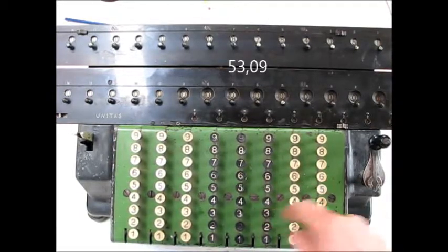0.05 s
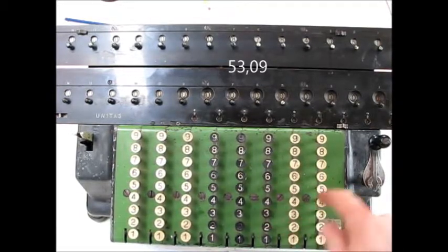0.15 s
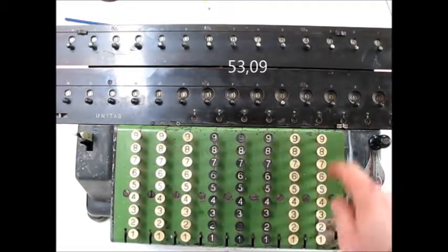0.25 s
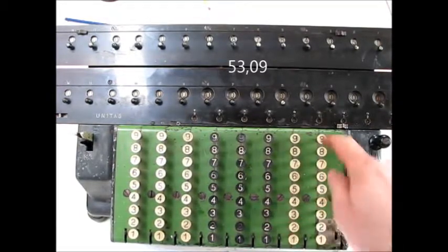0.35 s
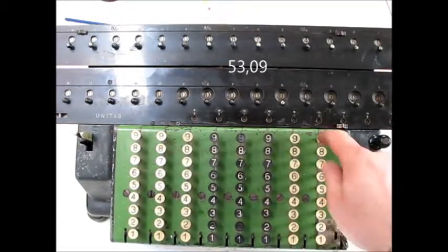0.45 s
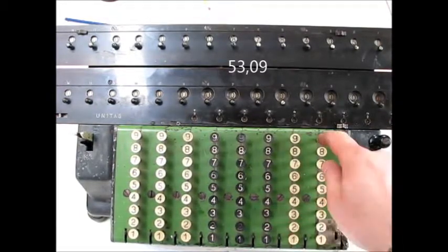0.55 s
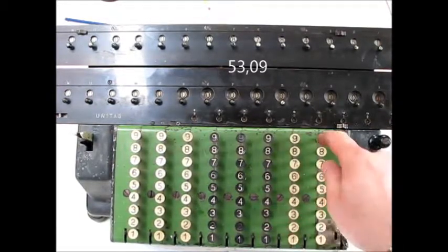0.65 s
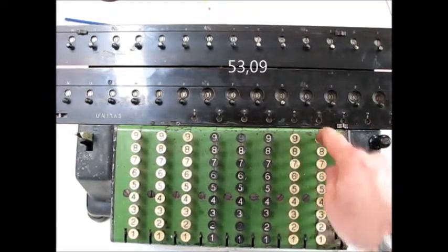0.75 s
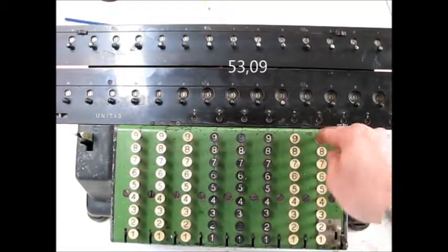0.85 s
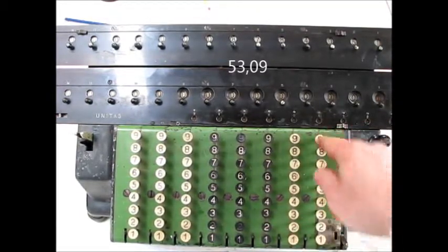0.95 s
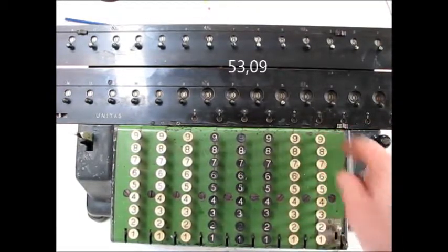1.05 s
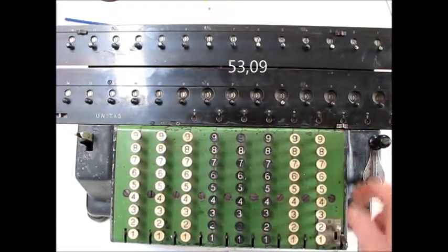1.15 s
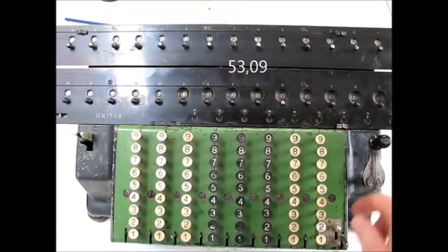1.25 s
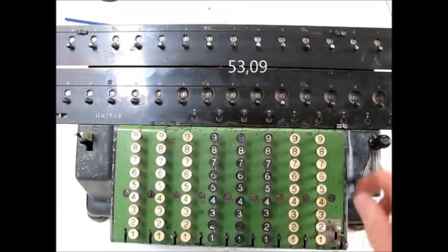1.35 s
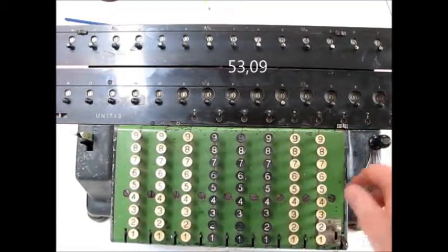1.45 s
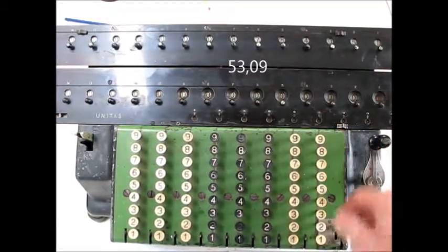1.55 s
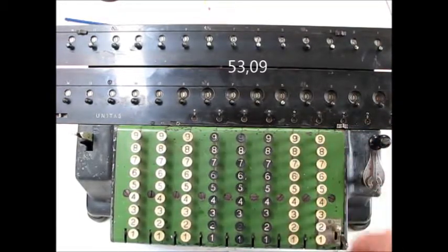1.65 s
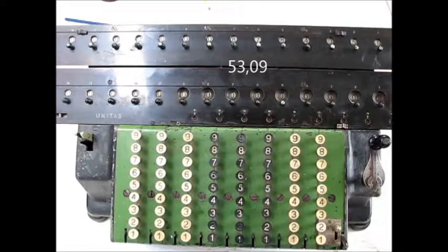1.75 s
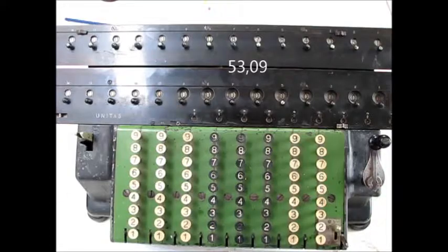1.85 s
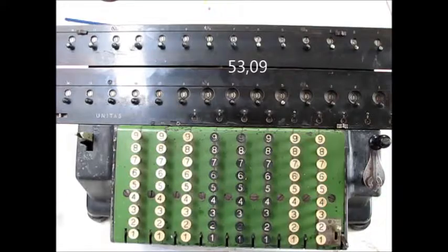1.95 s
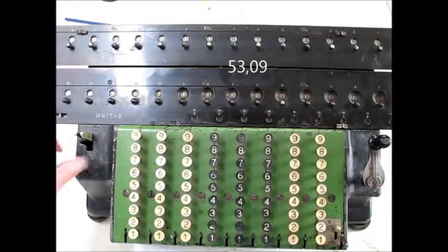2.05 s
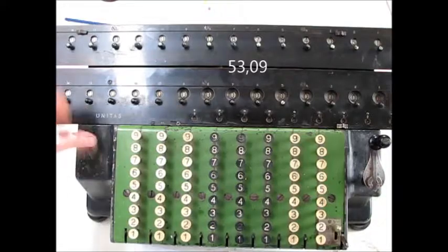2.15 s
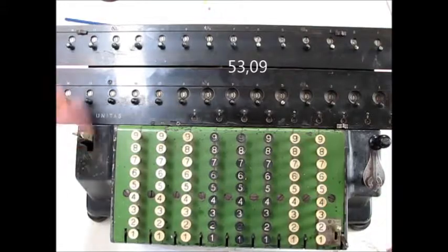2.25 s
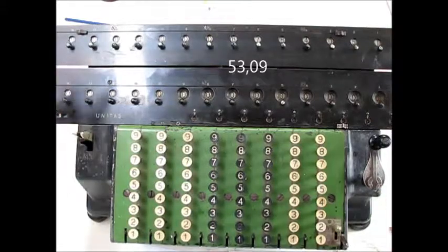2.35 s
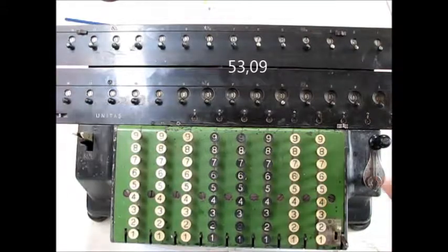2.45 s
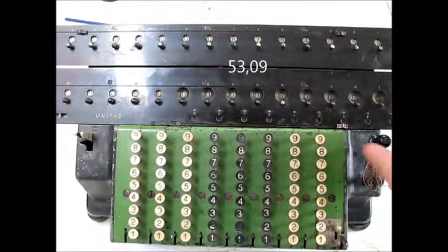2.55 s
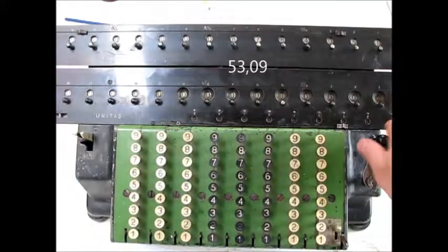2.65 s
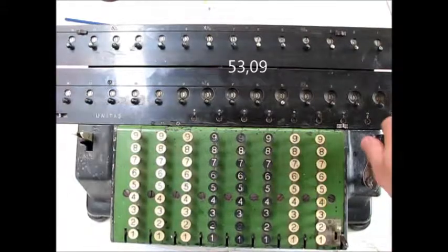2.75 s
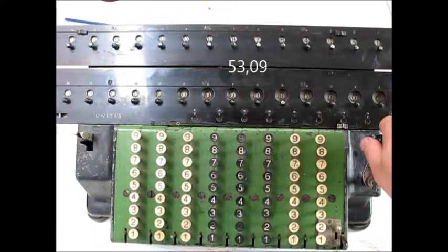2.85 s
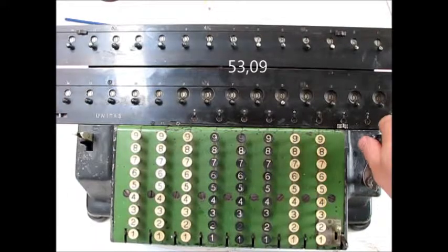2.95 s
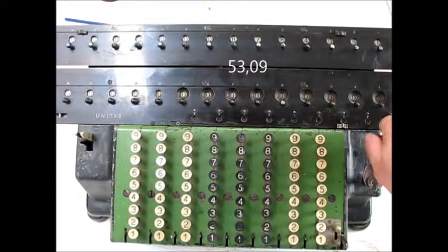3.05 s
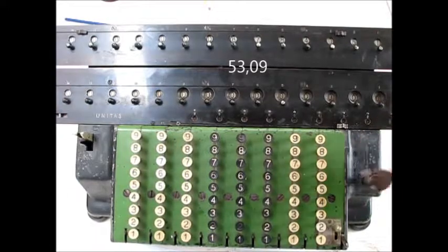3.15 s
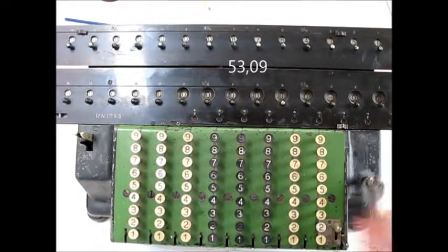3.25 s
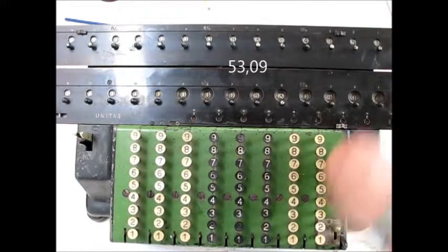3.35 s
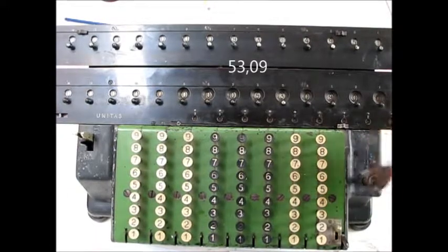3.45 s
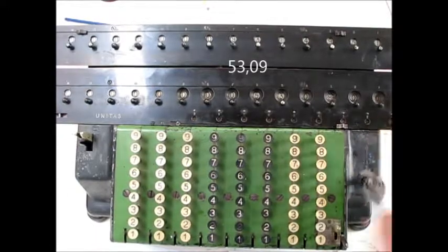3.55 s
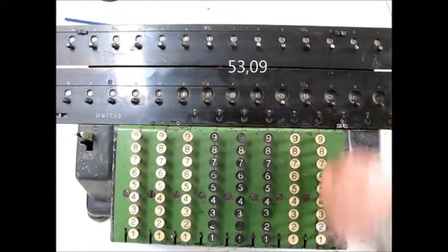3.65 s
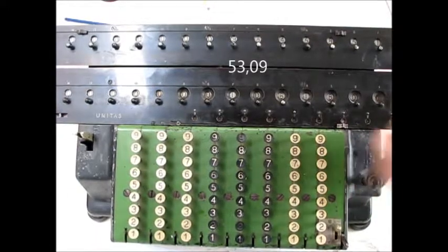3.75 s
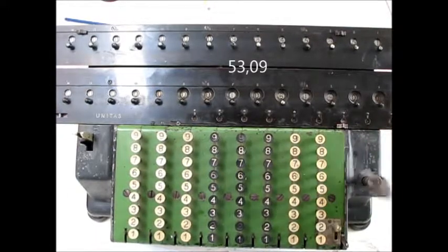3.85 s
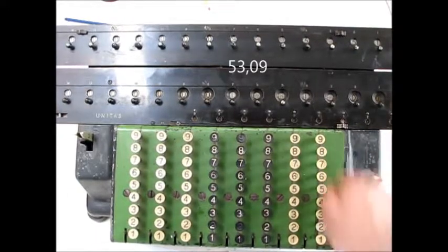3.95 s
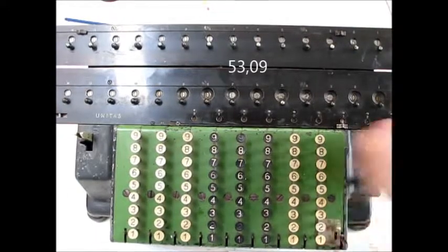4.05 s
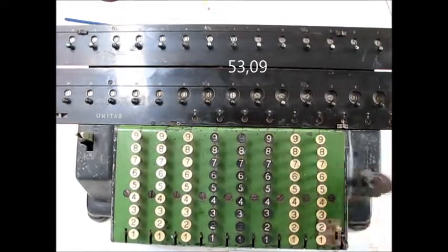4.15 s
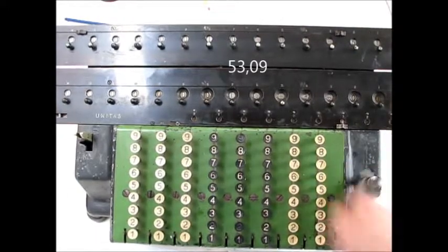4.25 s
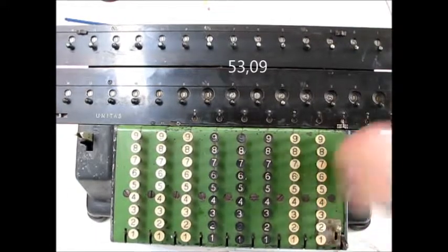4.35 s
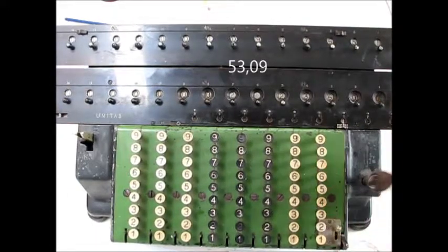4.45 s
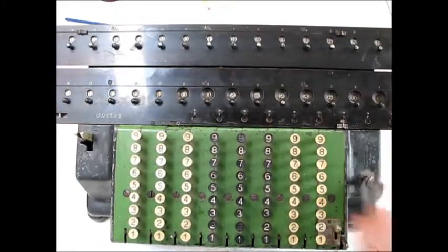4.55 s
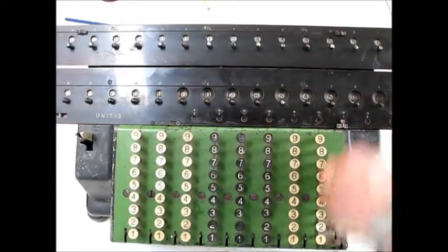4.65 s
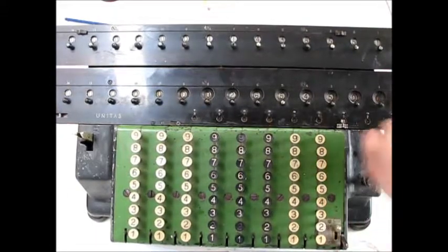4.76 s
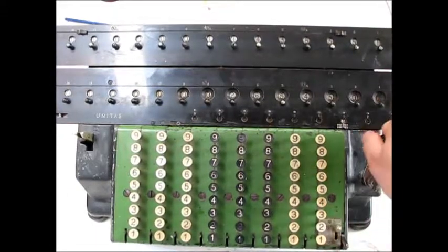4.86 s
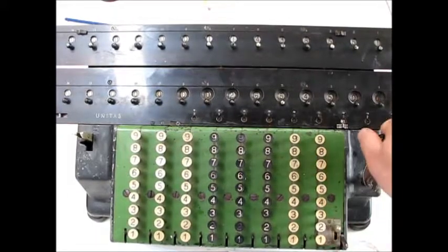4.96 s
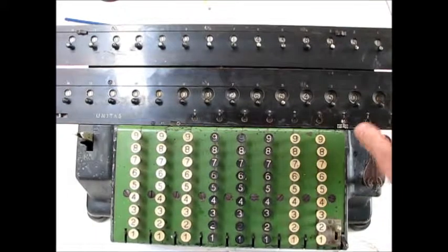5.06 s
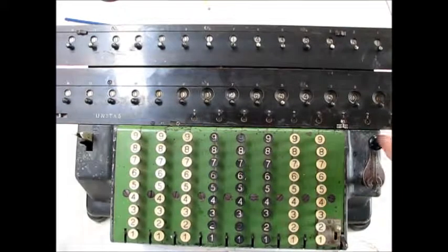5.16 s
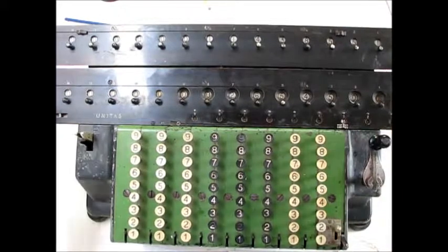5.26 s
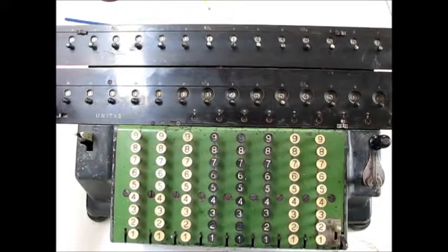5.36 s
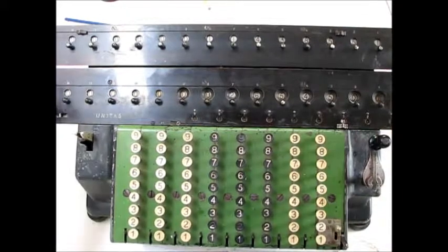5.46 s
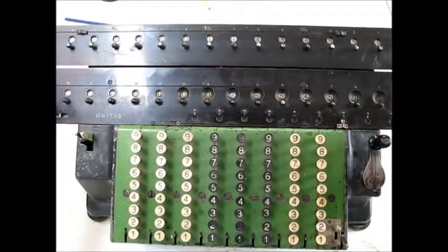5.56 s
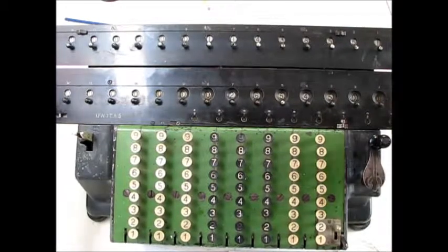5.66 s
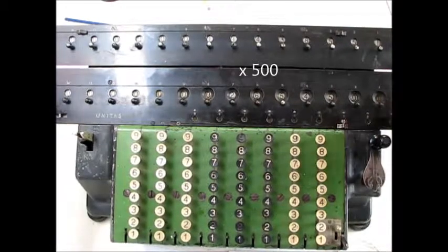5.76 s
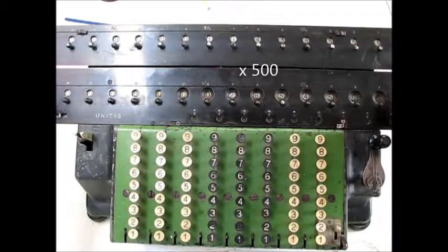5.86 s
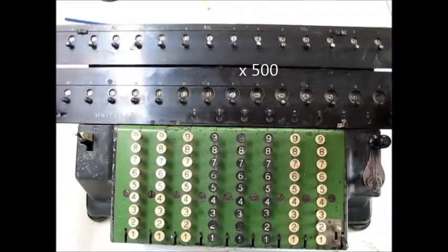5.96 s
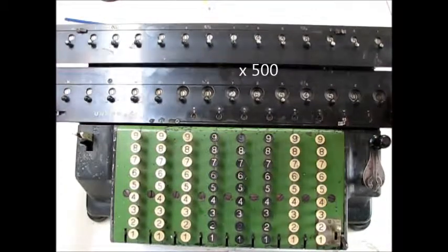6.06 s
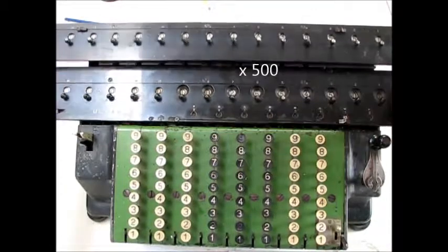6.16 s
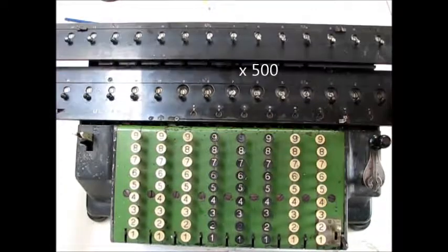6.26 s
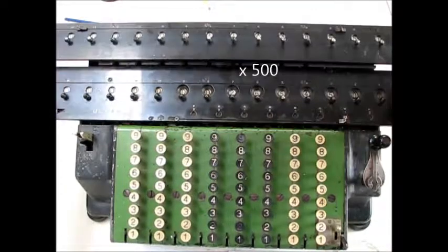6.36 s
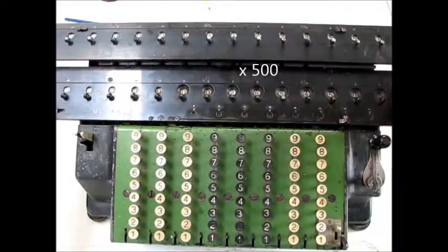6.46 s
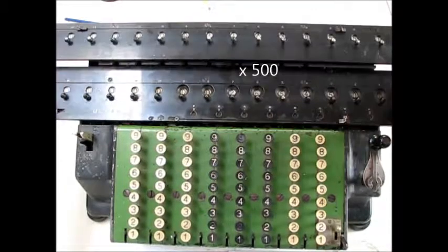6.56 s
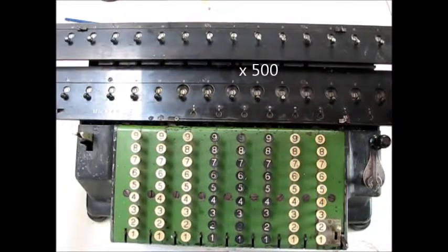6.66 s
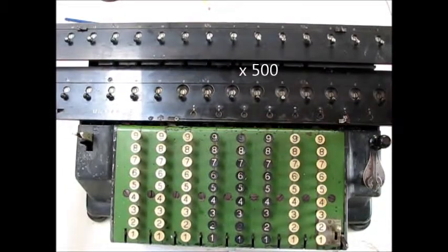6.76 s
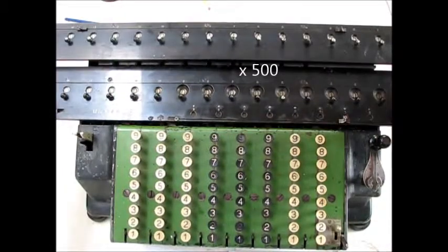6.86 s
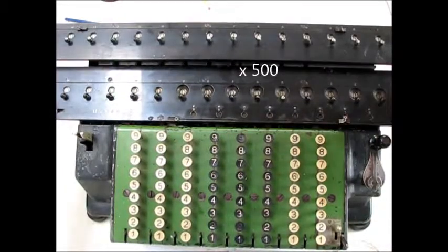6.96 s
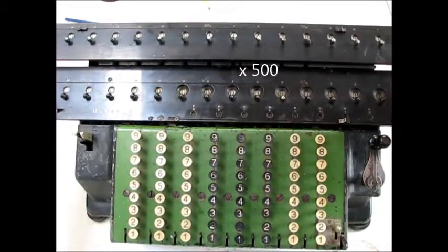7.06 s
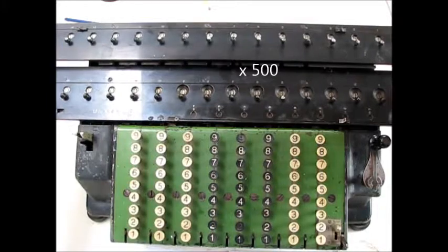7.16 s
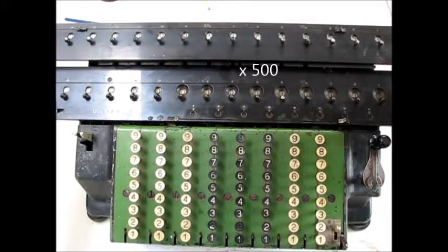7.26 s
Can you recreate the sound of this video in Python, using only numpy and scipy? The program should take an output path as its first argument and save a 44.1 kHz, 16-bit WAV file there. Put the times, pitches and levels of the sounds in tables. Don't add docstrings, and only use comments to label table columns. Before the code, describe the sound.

Close to the microphones in a small hard room, a steel key snaps down with a bright springy clack. Faint handling and dull slides follow. Then a hand crank turns five times in quick succession, each a pawl click, gear rattle, wheel knocks and a hard stop. A thin bar hums on quietly, then the carriage shifts and lands with several clattering metal knocks.

```python
import sys
import numpy as np
from scipy import signal
from scipy.fft import rfft, irfft, next_fast_len
from scipy.io import wavfile
from scipy.ndimage import uniform_filter1d

SR = 44100
rng = np.random.default_rng(int(sys.argv[2]) if len(sys.argv) > 2 else 0)


def digitize_waveform(pressure):
    field = np.atleast_2d(pressure).T
    bounded = np.clip(field, -1, 1)
    quanta = np.round(bounded * 32767).astype(np.int16)
    wavfile.write(sys.argv[1], SR, quanta)


def magnitude_from_level(level_db):
    exponent = np.asarray(level_db, float) / 20
    return 10 ** exponent


N = 321924

# (pawl lets go [s], crank meets the stop [s])
TURNS = [
    (3.1889, 3.4269),
    (3.5144, 3.7536),
    (3.8541, 4.078),
    (4.19, 4.4015),
    (4.5254, 4.7626),
]


def along(points, hz):
    f, v = np.transpose(points)
    return np.interp(np.log(hz + 1), np.log(f + 1), v)


def curves(rows):
    s, *cols = np.transpose(rows)
    return np.array([np.interp(np.arange(N) / SR, s, c, -120, -120) for c in cols])


def filtered(x, response):
    m = next_fast_len(N + SR // 4)
    return irfft(rfft(x, m) * response(np.fft.rfftfreq(m, 1 / SR)), m)[..., :N]


def causal(gain):
    cepstrum = irfft(np.log(gain + 1e-5))
    half = len(cepstrum) // 2
    cepstrum[1:half] *= 2
    cepstrum[half + 1:] = 0
    h = irfft(np.exp(rfft(cepstrum)))[:4096]
    return h / np.linalg.norm(h)


def ports(pair):
    # (frequency [Hz], left-right likeness [0-1])
    likeness = [(60, .97), (500, .97), (1400, .8), (3500, .42), (8000, .5), (15000, .55)]
    # (frequency [Hz], left port leads by [rad])
    left_lead = [(2000, 0), (5500, -.3), (8000, -1), (12000, -1.4), (16000, -2)]

    def turn(hz):
        return np.arccos(np.clip(along(likeness, hz), 0, 1)) / 2

    def lead(hz):
        return np.exp(.5j * along(left_lead, hz) * np.array([[1], [-1]]))

    same = filtered(pair[0], lambda hz: np.cos(turn(hz)) * lead(hz))
    different = filtered(pair[1], lambda hz: np.sin(turn(hz)))
    return same + different * [[1], [-1]]


def room(x, level_db=-11):
    # (frequency [Hz], decay by 60 dB [s])
    decay = [(100, .2), (180, 0.39), (300, 0.92), (1300, 0.95), (5000, 0.68), (12000, 0.44)]
    earlier_s, earlier_db = .12, -15
    dull_tick = magnitude_from_level(earlier_db) * 16 * np.exp(-np.arange(40) / 1.18)
    x = np.concatenate([dull_tick, np.zeros(round(earlier_s * SR) - 40), x])
    out, step = np.zeros((2, N + 3 * SR)), SR // 2
    for k in range(0, len(x), step):
        hz, t, z = signal.stft(rng.standard_normal((2, SR)), SR, nperseg=256)
        turn = np.arccos(np.exp(-hz / 4000))[:, None] / 2
        same, different = np.cos(turn) * z[0], np.sin(turn) * z[1]
        z = np.array([same + different, same - different])
        tail = signal.istft(z * magnitude_from_level(-60 * t / along(decay, hz)[:, None]), SR, nperseg=256)[1]
        tail = tail * (1 - np.exp(-np.arange(tail.shape[1]) / SR / 0.0034))
        wet = signal.fftconvolve(x[None, k:k + step], tail / np.linalg.norm(tail[0]), axes=1)
        out[:, k:k + wet.shape[1]] += wet
    return magnitude_from_level(level_db) * out[:, len(x) - N:][:, :N]


def air(hush_db=-61.5):
    # (time [s], rumble level [dB])
    rumble_levels = [(0, -53), (1.0, -59.5), (1.5, -56), (2.3, -51), (2.9, -53.5), (3.3, -57), (4.8, -62),
                     (5.1, -58), (6.56, -55), (6.6, -75), (7.3, -66)]
    # (time [s], hush added while hands move [dB])
    hush_busy = [(0, -0.5), (1.6, -1), (2.3, 3), (3.0, 4), (3.3, 9.5), (4.8, 9.5), (5.1, 0.5), (6.3, 3.5),
                 (7.3, -3)]
    # (frequency [Hz], density [dB per Hz])
    hush_colour = [(50, -45), (90, 1.5), (206, 2.5), (640, -8), (1030, -10), (3000, -15), (6650, -18.5),
                   (9000, -20.5), (15200, -26.5), (16300, -32)]
    # (frequency [Hz], density [dB per Hz])
    rumble_colour = [(8.8, -31), (15, -3), (49, 0.5), (60, -8.5), (76, -23), (120, -23), (160, -27),
                     (260, -120)]

    def coloured_noise(points):
        return filtered(rng.standard_normal((2, N)), lambda hz: magnitude_from_level(along(points, hz)))

    rumble_db, busy_db = np.clip([curves(rumble_levels)[0], curves(hush_busy)[0]], -90, 20)
    rumble = coloured_noise(rumble_colour)
    hush = ports(coloured_noise(hush_colour))
    rumble = rumble[0] + 0.18 * rumble[1] * [[1], [-1]]
    return magnitude_from_level(rumble_db) * rumble / rumble.std() + magnitude_from_level(hush_db + busy_db + 4) * hush / hush.std()


def whine(level_db=-63.5, tone_hz=7867.1, burst_hz=29.97):
    burst_s, change_s = 1.328, 6.565
    t = np.arange(N) / SR
    frame = (t - burst_s) * burst_hz
    gate = (frame % 1 < .5) * (-1.) ** np.floor(frame) * (t < change_s)
    return magnitude_from_level(level_db) * uniform_filter1d(gate, 30) * np.sin(2 * np.pi * tone_hz * t)


def parts(ringing):
    # (frequency [Hz], density [dB per Hz])
    machine_colour = [(50, -35), (110, -5.5), (180, -1.5), (460, -2), (640, -13), (970, -2), (1750, -6),
                      (3070, 2), (5100, 2), (7300, -1), (10600, 0.5), (13000, -6.5), (15300, -6),
                      (16400, -43.5)]
    # (frequency [Hz], width [Hz], level over the body [dB])
    plates = [(180, 10, 2.5), (341, 68, 2.5), (465, 34, 2), (955, 47, -3.5), (1130, 35, 5), (1635, 72, 4),
              (2150, 22, -3.5), (3090, 140, 2.5), (4250, 900, 0.5), (5180, 57, 6), (6400, 37, -2.5),
              (11750, 330, 13.5), (13470, 1300, 11.5)]
    f = np.fft.rfftfreq(16384, 1 / SR)
    rings = sum(magnitude_from_level(2 * db) / (1 + ((f - hz) / width * 2) ** 2) for hz, width, db in plates)
    body = magnitude_from_level(along(machine_colour, f)) * np.sqrt(1 + ringing * rings)
    a, b, c = [1 / (1 + (f / edge_hz) ** 8) for edge_hz in (700, 2100, 9800)]
    shares = (a, (1 - a) * b, (1 - b) * c, 1 - c)
    return [causal(body * np.sqrt(share)) for share in shares]


def blows():
    # (time [s], steel peak [dB], thud [dB], spring fizz [dB], ping [Hz])
    keys = [(.718, -6, -31, -33, 4000), (.724, -15, -31, -39, 4250), (.737, -20, -36, -34, 4600),
            (.777, -28, -31, -25, 4680), (2.1142, -50, -52, -66, 3790), (2.173, -30.5, -45, -67, 2760),
            (2.266, -35.5, -51, -70, 2950), (2.684, -44, -53, -68, 3160), (2.7376, -50, -50, -67, 3430),
            (3.1153, -33, -53, -65, 4760), (3.1283, -35, -47, -58, 2860), (3.1408, -22.5, -39, -46, 4760),
            (5.355, -48, -56, -52, 5520), (6.1749, -23.5, -35.5, -46, 5000),
            (6.188, -24.5, -31.5, -52, 3170), (6.7757, -16.5, -40, -22.5, 3400)]
    # (time [s], steel peak [dB], knock [dB], spring fizz [dB], ping [Hz])
    carriage = [(.696, -43, -51, -60, 3600), (.7694, -5, -16, -14, 6000), (.9616, -27, -40, -51, 3430),
                (.9663, -27, -43, -43, 3270), (2.6499, -40, -46, -67, 2960),
                (2.777, -31.5, -46.5, -67, 3850), (5.0512, -31, -46, -60, 3800),
                (6.5683, -11.5, -23, -18.5, 4920), (6.575, -12, -22, -12.5, 5140),
                (6.5841, -22, -27.5, -13.5, 5150), (6.5918, -12, -28.5, -12.5, 4860),
                (6.5994, -11.5, -31, -16.5, 5140), (6.6048, -31, -28.5, -24, 5100),
                (6.7786, -11, -26, -38.5, 2900), (6.981, -7, -26, -28, 3320), (6.9929, -14, -24, -17, 3200),
                (6.9968, -8, -31, -29, 4250)]
    # (time [s], steel peak [dB], spring fizz [dB])
    knocks = [(3.1701, -20, -37), (3.214, -14, -21), (3.2249, -11, -19), (3.281, -7.5, -20),
              (3.275, -8, -16), (3.2925, -7, -14), (3.301, -8.5, -13), (3.3357, -14, -22),
              (3.3506, -12, -16), (3.3609, -11, -15), (3.586, -18.5, -28), (3.6218, -13, -22.5),
              (3.6431, -13, -24), (3.657, -13.5, -25), (3.837, -17, -21), (3.913, -9, -21.5),
              (3.9584, -13.5, -22), (3.9696, -12, -20.5), (4.0077, -6, -14), (4.026, -10.5, -18.5),
              (4.1591, -15, -28), (4.2345, -12.5, -26), (4.2678, -8.5, -19), (4.3245, -6.5, -18),
              (4.343, -12.5, -18.5), (4.483, -16, -26), (4.2932, -10, -19), (4.5737, -12, -16),
              (4.601, -13.5, -23), (4.6761, -12, -21)]
    # (pawl [dB], its spring [dB], stop [dB], stop ping [Hz])
    clacks = [
        (-4.5, -17, -7.5, 5000),
        (-11, -15, -7, 5700),
        (-10, -16.5, -5.5, 5600),
        (-6.5, -23, -5, 5600),
        (-5.5, -24, -2, 5500),
    ]
    pawl_again_s, pawl_again_db = .005, -4
    stop_again_s, stop_again_db = .007, -6.5
    rows = []
    for table, case_over_cover_db in ((keys, 3), (carriage, -16.5)):
        for s, db, thud, fizz, hz in table:
            rows.append((s, db, thud + case_over_cover_db, thud, fizz, hz))
    for s, db, fizz in knocks:
        rows.append((s, db, db - 23, db - 20, fizz, 3700))
    for (go, stop), (pawl, fizz, clack, hz) in zip(TURNS, clacks):
        pawl_db = np.array([pawl, pawl - 27.5, pawl - 21, fizz])
        stop_db = clack + np.array([0, -40, -32, -26])
        for k in range(3):
            rows.append((go + k * pawl_again_s, *(pawl_db + k * pawl_again_db), 3200))
            rows.append((stop + k * stop_again_s, *(stop_db + k * stop_again_db), hz))
    return rows


def contacts(tick_s=.016, chatter_s=.05, sharp=1.5):
    force, punch = np.zeros((4, N + SR)), np.zeros((4, N))
    t = np.arange(SR // 12) / SR
    rows = blows()
    fall = magnitude_from_level(-60 * t / tick_s) + .4 * magnitude_from_level(-60 * t / chatter_s)
    chatter = rng.standard_normal((len(rows), len(t))) * fall
    chatter[:, 0] = 3.5
    for (s, db, case_db, cover_db, spring_db, hz), blow in zip(rows, chatter):
        share = magnitude_from_level([[case_db + 3], [cover_db + 1], [db - 7.5], [spring_db + 1]])
        piece = signal.iirpeak(hz, sharp, SR)
        steel = signal.lfilter(*piece, blow)
        force[:, round(s * SR):][:, :len(t)] += share * [blow, blow, steel, blow]
        punch[:, round(s * SR)] = share[:, 0] * np.linalg.norm(fall) * [1, 0.95, 1.0, 1]
    return force[:, :N], punch


def desk(waver=.05):
    # (time [s], peak [dB], pitch [Hz], decay by 60 dB [s])
    bumps = [(.719, -24.5, 312, 0.16), (5.205, -52, 200, .13), (5.36, -54, 330, 0.17),
             (5.807, -36.5, 145, 0.095), (6.176, -24, 140, 0.12), (6.178, -34, 235, 0.53),
             (6.175, -15, 930, 0.033), (6.188, -22, 990, 0.045), (6.19, -35, 345, 0.31),
             (6.57, -25.5, 870, 0.13), (6.78, -35.5, 340, 0.17), (6.78, -41.5, 175, 0.38),
             (6.982, -16, 1350, 0.051), (6.995, -31, 1090, 0.25), (6.57, -21.5, 1550, .05),
             (.7696, 2, 4450, .004), (.7696, -2, 1450, .006), (.7705, -25, 320, .3), (.718, -12, 3800, .01),
             (3.222, -24, 465, .085), (2.174, -39, 1150, .085), (2.268, -46, 370, .08),
             (2.778, -38, 4400, .02), (5.055, -54, 1750, .15), (6.6, -22.5, 5130, 0.076),
             (3.225, -24, 5170, 0.087), (.772, -34, 1100, 0.3), (2.658, -44, 400, .1), (3.1, -44, 1400, .1)]
    out, t = np.zeros(N + SR), np.arange(SR // 3) / SR
    drift = uniform_filter1d(rng.standard_normal((len(bumps), len(t))), 400, axis=1) * 20
    for (s, db, hz, t60), d in zip(bumps, drift):
        settling = waver * np.cumsum(d) / SR * (t60 > .09)
        onset = 1 - np.exp(-t * hz / .7)
        out[round(s * SR):][:len(t)] += magnitude_from_level(db - 60 * t / t60) * onset * np.sin(2 * np.pi * hz * (t + settling))
    return out[:N]


def scrapes():
    # (start [s], loudest [s], end [s], steel [dB], case and cover over steel [dB])
    slides = [
        (2.04, 2.082, 2.13, -57, 0),
        (2.172, 2.177, 2.34, -55, 11),
        (2.6, 2.678, 2.79, -57, 10),
        (2.77, 2.78, 2.93, -58, 4),
        (3.058, 3.069, 3.15, -43, 5),
        (5.052, 5.064, 5.16, -55, 4),
        (6.569, 6.598, 6.618, -21, -26),
    ]
    edge_db = -11
    out = []
    for start, top, end, db, dull in slides:
        fizz = -15.5 - 0.75 * dull
        outline = ((start, edge_db), (top, 0), (end, edge_db))
        out.append([(s, db + edge, dull, dull, fizz) for s, edge in outline])
    return out


def gears():
    # (heaviest load [s], gears running light [dB], gears under load [dB])
    loads = [
        (3.298, -24, -22),
        (3.654, -34, -26),
        (4.0, -28, -21),
        (4.304, -25.5, -19.5),
        (4.645, -23, -22),
    ]
    spring_db = (-14, -8, -1.5, -5, 0.5, -7, -3)
    take_up_s, settle_s, coast_s, idle_s = .035, .025, .014, .075
    take_up_db, kick_db, coast_db, idle_db = -6, 6, -14, -38
    ref_db, body_swing = -25, 0.67
    out = []
    for (go, stop), (load, light, heavy) in zip(TURNS, loads):
        s = [go - take_up_s, go - .001, go + .004, go + settle_s, load, stop - coast_s, stop + idle_s]
        db = np.array([light + take_up_db, light + take_up_db / 2, light + kick_db, light,
                       heavy, heavy + coast_db, idle_db])
        lag = (body_swing - 1) * (db - ref_db)
        out.append(np.transpose([s, db, lag - 8, lag - 3, spring_db]))
    return out


def teeth(per_s=700, spread_db=3.5, t60=.01, smooth=.5):
    strength = magnitude_from_level(spread_db * np.minimum(rng.exponential(size=(2, N)), 2.5))
    strikes = (rng.random((2, N)) < per_s / SR) * strength
    grain = signal.lfilter([1], [1, -magnitude_from_level(-60 / SR / t60)], strikes)
    grain = (grain / np.sqrt(np.mean(grain ** 2)) + smooth) * rng.standard_normal((2, N))
    total = np.zeros((4, N))
    for rows in gears() + scrapes():
        level = curves(rows)
        level[1:] += level[0]
        total += magnitude_from_level(level)
    steel, case, cover, spring = total
    return magnitude_from_level(-7.5) * grain[[0, 0, 0, 1]] * np.array([case, cover, steel, spring])


def machine():
    force, punch = contacts()
    rattle, bumps = teeth(), desk()
    force = force + rattle
    other = force * rng.choice([-1, 1], N)
    pair, spread = np.zeros((2, N)), np.zeros(N)
    for a, b, h in zip(force, other, parts(0.94)):
        pair += signal.oaconvolve([a, b], h[None], axes=1)[:, :N]
    for a, h in zip(punch + rattle, parts(0.15)):
        spread += signal.oaconvolve(a, h)[:N]
    near = ports(pair) * magnitude_from_level([[-.6], [.6]]) + bumps
    return near, spread + 0.67 * bumps


def bar():
    # (time [s], pitch [Hz], level [dB])
    bell = [
        (4.78, 462, -62),
        (5.0, 462, -56),
        (5.5, 461.5, -60.5),
        (6.56, 461, -63.5),
    ]
    hz, db = curves(bell)
    return np.sqrt(2) * uniform_filter1d(magnitude_from_level(db), 2000) * np.sin(2 * np.pi * np.cumsum(hz) / SR)


def scene():
    near, spread = machine()
    return near + room(spread) + bar() + air() + whine()


def band_limit(x):
    return signal.sosfilt(signal.butter(12, 16480, fs=SR, output="sos"), x)


def record(dry):
    mix = np.clip(dry, -1, 1)
    return band_limit(mix)


dry = scene()
out = record(dry)
digitize_waveform(out)
```